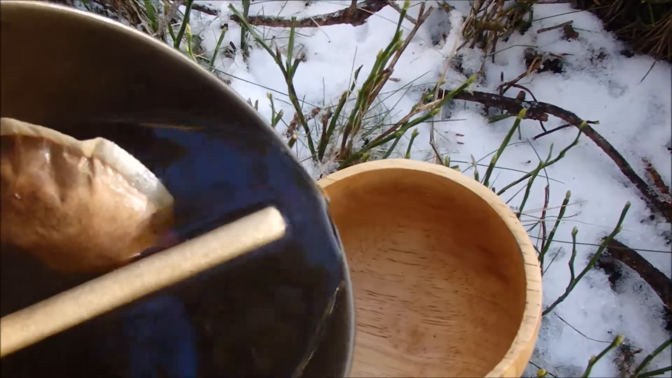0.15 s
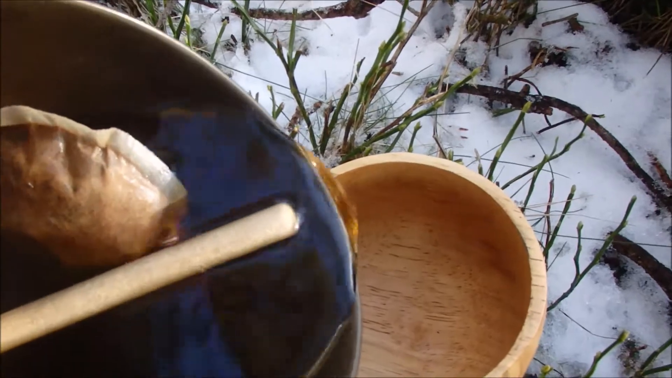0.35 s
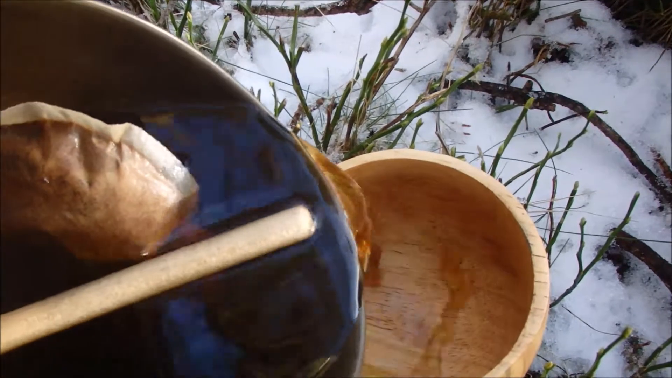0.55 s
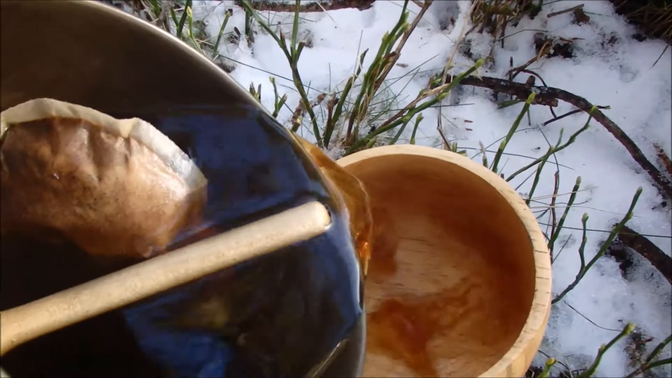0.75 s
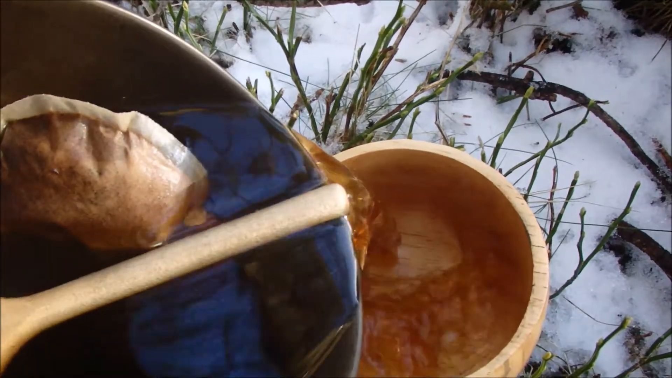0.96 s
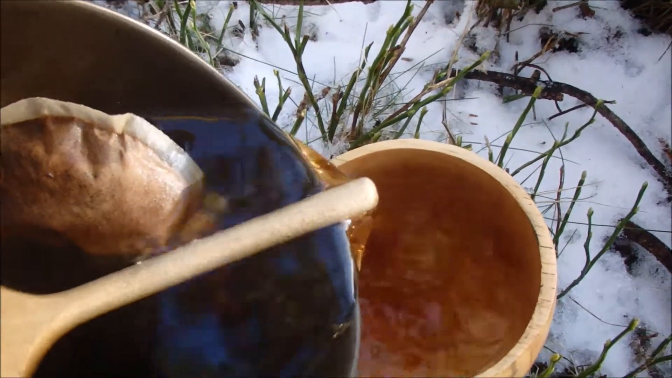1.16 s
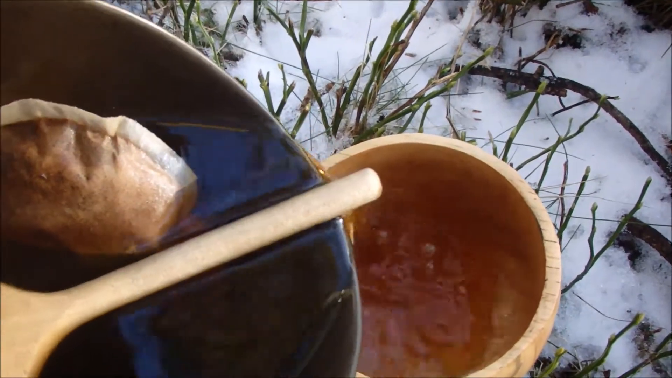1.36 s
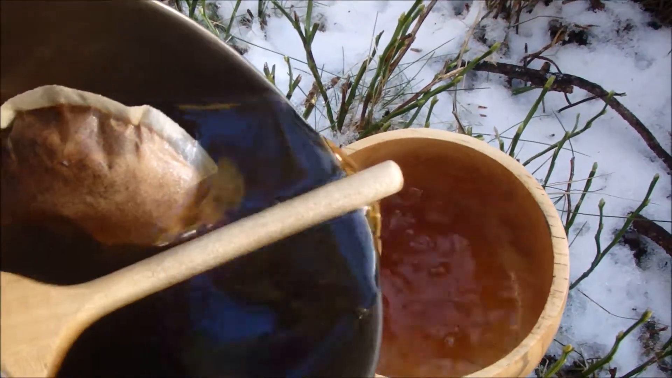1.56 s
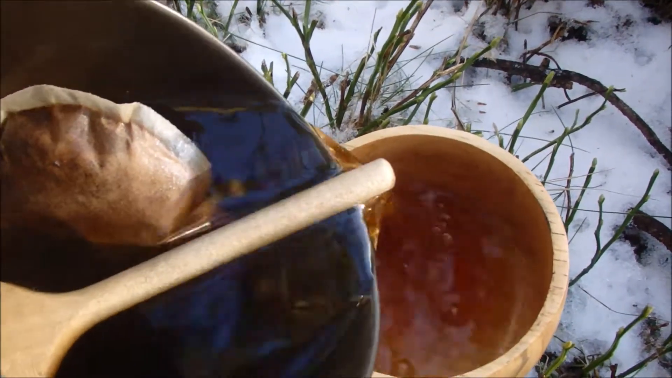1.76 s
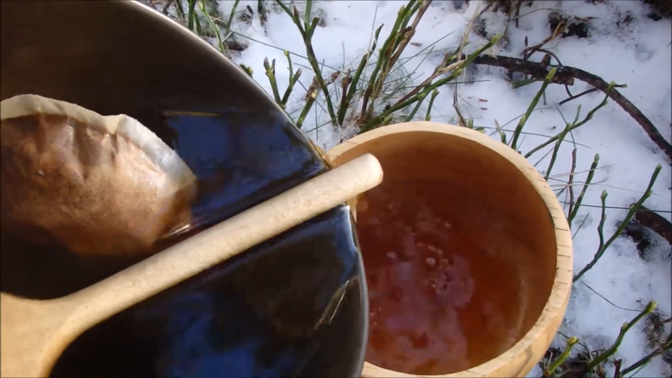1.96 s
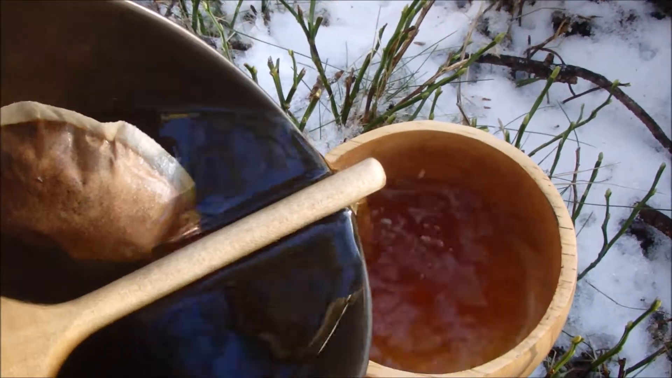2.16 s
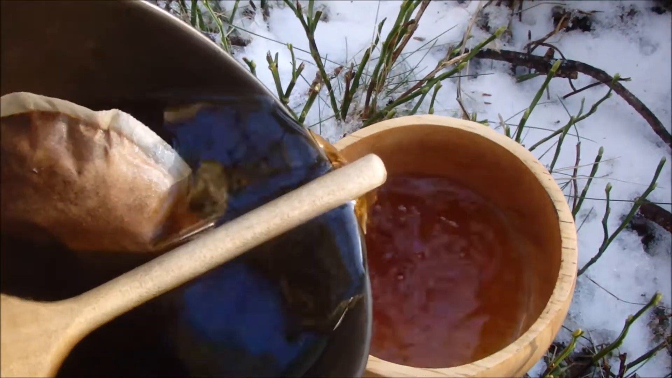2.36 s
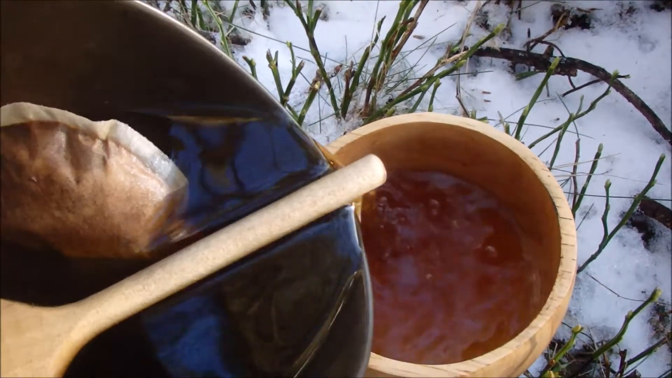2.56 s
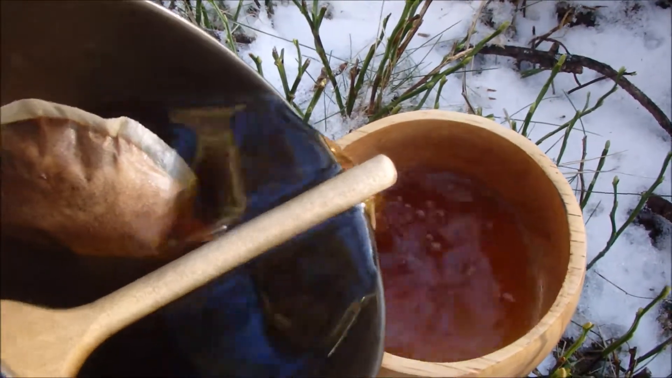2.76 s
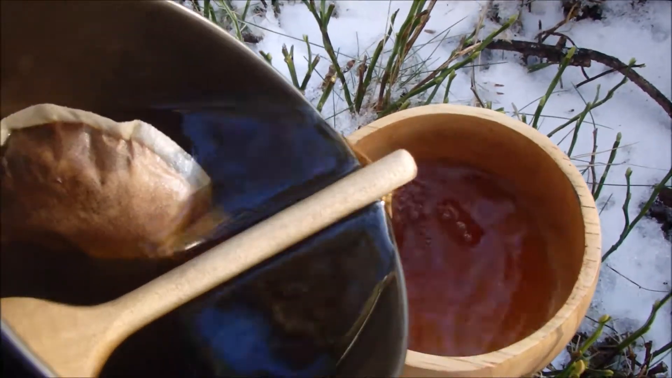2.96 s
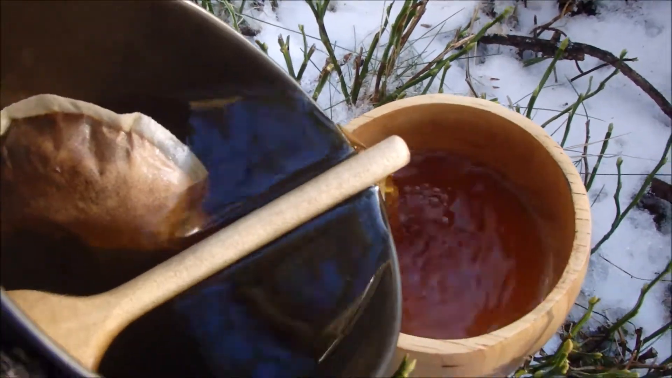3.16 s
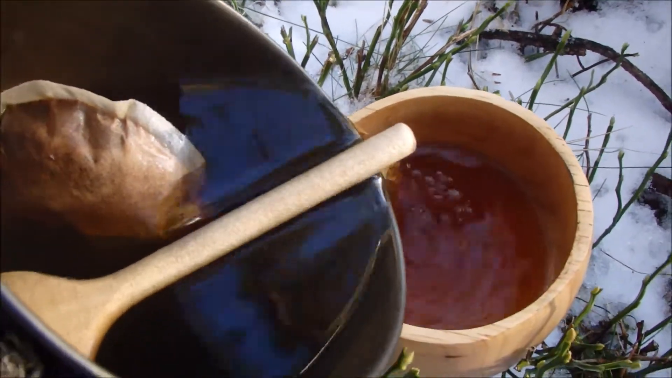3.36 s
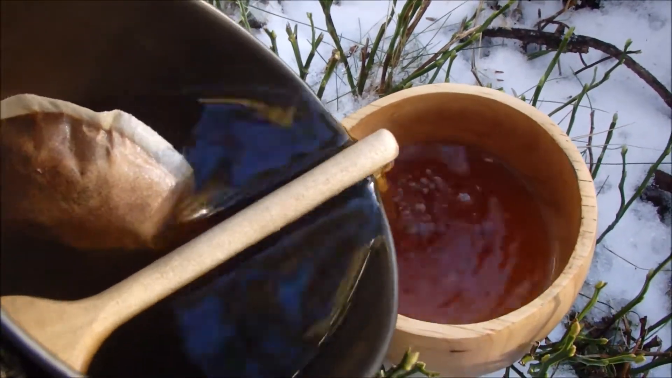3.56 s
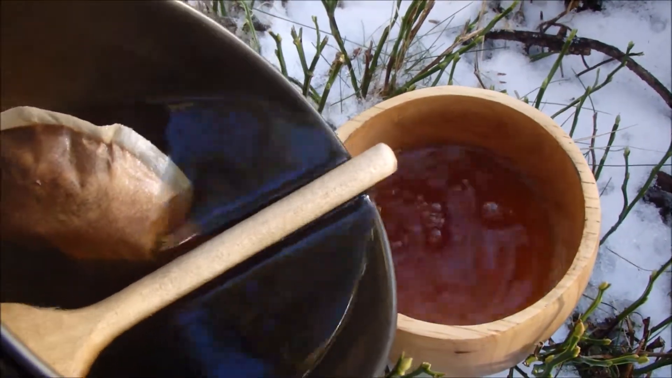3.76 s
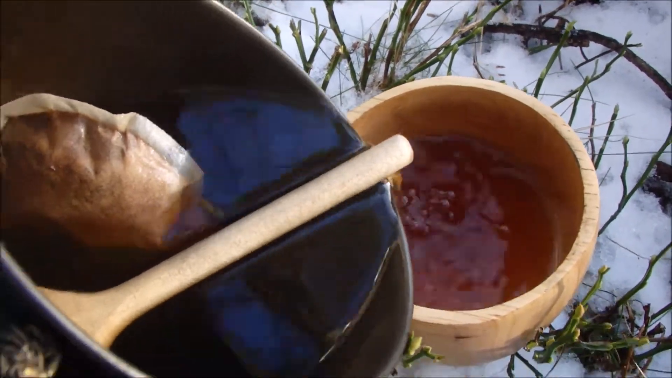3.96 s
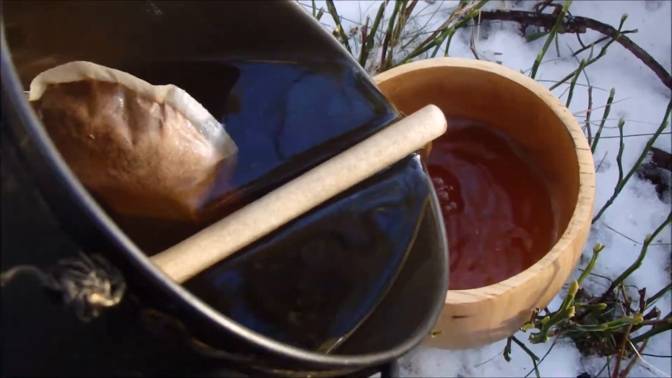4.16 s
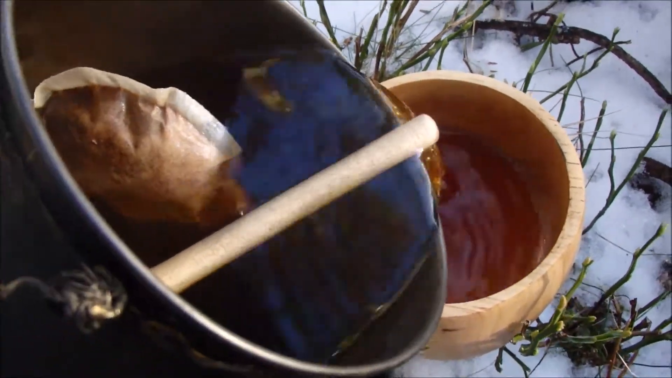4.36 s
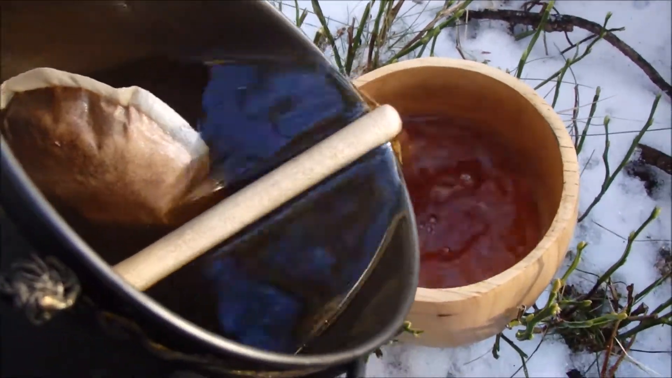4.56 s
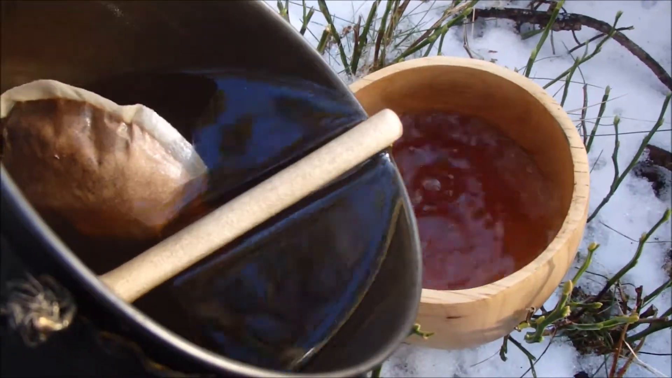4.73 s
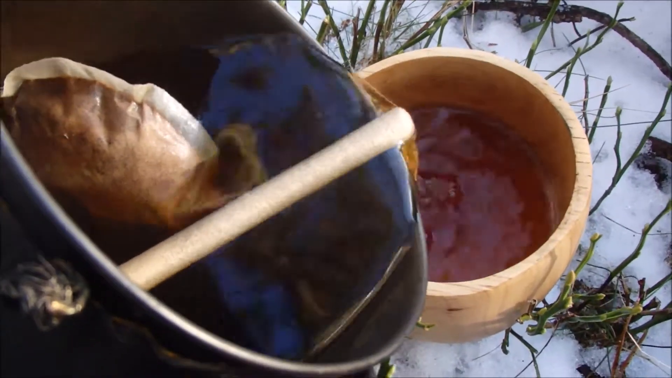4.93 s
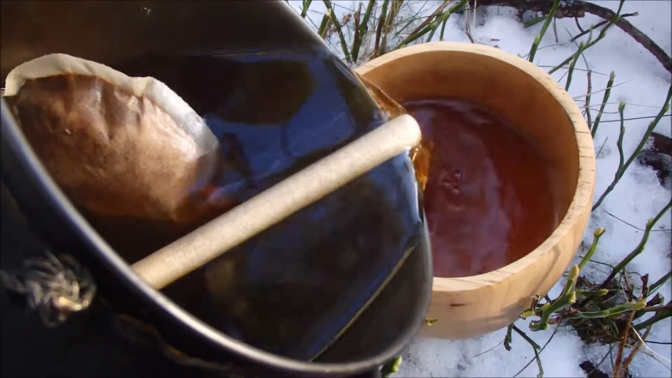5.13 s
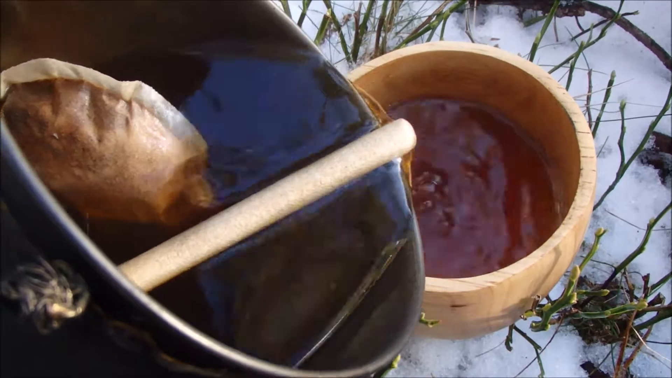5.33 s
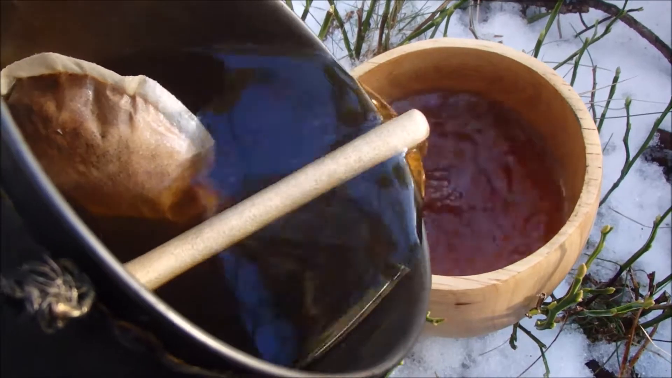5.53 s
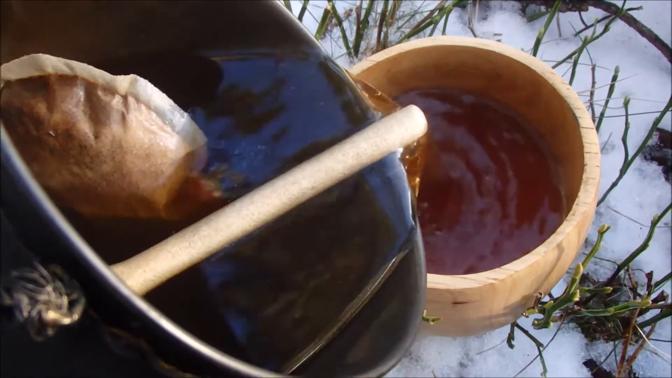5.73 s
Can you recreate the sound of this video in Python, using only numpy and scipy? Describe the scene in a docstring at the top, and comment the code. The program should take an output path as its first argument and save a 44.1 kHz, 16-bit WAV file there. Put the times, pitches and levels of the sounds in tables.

```python
"""Drink poured into a wooden bowl

Outdoors in the snow, heard close up, a drink runs over the rim of a metal pot: short plops over a fine fizz.
Damped, rising sines make the bubbles; shaped noise makes the spray, mist and air. A wooden spoon knocks in the
pot and its handle clinks, as ringing modes with a scrape. The stream slides over bare wood, then spatters and traps
air in the rising pool. Two resonant microphone ports pick it up, the right one muffled."""
import sys
import numpy as np
from scipy import signal
from scipy.fft import rfft, irfft, next_fast_len
from scipy.io import wavfile
from scipy.ndimage import map_coordinates

SR = 44100
rng = np.random.default_rng(int(sys.argv[2]) if len(sys.argv) > 2 else 0)


def put_to_file(sound):
    """Save the sound as 16-bit audio at rate SR, in the file named by the first command-line argument."""
    columns = np.atleast_2d(sound).T  # one column per channel
    safe = np.clip(columns, -1, 1)
    whole_steps = np.round(safe * 32767)
    wavfile.write(sys.argv[1], SR, whole_steps.astype(np.int16))


N = 259749  # length in samples


def amp(db):
    """Decibels to gain."""
    return 10 ** (np.asarray(db) / 20)


def unit(x):
    """x scaled to rms 1."""
    return x / np.sqrt(np.mean(x ** 2) + 1e-20)


def along(points, hz):
    """(Hz, value) points read on a log frequency axis."""
    point_hz, value = np.transpose(points)
    return np.interp(np.log(hz + 1), np.log(point_hz + 1), value)


def curves(rows):
    """One value per sample for each column after the time."""
    s, *columns = np.transpose(rows)
    return [np.interp(np.arange(N) / SR, s, column) for column in columns]


def wobble(rate):
    """A smooth random curve with this many knots a second."""
    knots = rng.standard_normal(int(N * rate / SR) + 4)
    return map_coordinates(knots, [np.arange(N) * rate / SR])


def fade(t, t60):
    """A decay that loses 60 dB in t60 seconds."""
    return np.exp(-np.log(1000) * t / max(t60, 1e-4))


def flowing(rows, ramp_s=0.043):
    """Fades a flow in at the first row of its curve and out after the last."""
    t = np.arange(N) / SR
    fade_in = np.clip((t - rows[0][0]) / ramp_s, 0, 1)
    fade_out = np.clip(1 + (rows[-1][0] - t) / ramp_s, 0, 1)
    return fade_in * fade_out


def add(track, s, sound):
    """Mix a sound into the track at time s."""
    part = track[max(round(s * SR), 0):][:len(sound)]
    part += sound[:len(part)]


def coloured(x, gain):
    """x through the causal, minimum-phase filter that has this gain over frequency."""
    m = 2 * next_fast_len(N // 2 + SR // 8)
    log_gain = np.log(np.maximum(gain(np.fft.rfftfreq(m, 1 / SR)), 1e-6))
    # folding the cepstrum onto positive times makes the filter causal
    cepstrum = irfft(log_gain, m)
    cepstrum[1:m // 2] *= 2
    cepstrum[m // 2 + 1:] = 0
    return irfft(rfft(x, m) * np.exp(rfft(cepstrum)), m)[..., :N]


def bubbles(rate, centre_hz, spread, cycles, scatter_db, rise, size=512):
    """A swarm of tiny damped bubbles, rms 1: random times, pitches and strengths, each gliding up."""
    draw = rng.random((int(rate * N / SR), 4))
    start = (draw[:, :1] * N).astype(int)
    bell = np.log((draw[:, 1:2] + .05) / (1.05 - draw[:, 1:2]))  # mostly near the centre pitch
    hz = np.minimum((centre_hz * np.ones(N))[start] * np.exp(spread * bell), SR / 3)
    turns = hz * np.arange(size) / SR
    age = turns / (cycles * (.5 + draw[:, 2:3]))  # reaches 1 when the ring is 60 dB down
    tone = np.sin(2 * np.pi * turns * (1 + rise * age))
    rings = amp(scatter_db * draw[:, 3:] ** 2) * tone * np.exp(-np.log(1000) * age)
    places = start + np.arange(size)
    return unit(np.bincount(places.ravel(), rings.ravel(), N)[:N])


# Still outdoor air and microphone hiss. Each row: frequency [Hz], relative density [dB per Hz].
AIR_SPECTRUM = [(20, -15), (60, -10.5), (120, 0), (250, 0.5), (500, 2), (950, 2.5), (1600, -2.5),
                (2200, -4), (2800, -0.5), (3500, -5), (4200, -4), (6000, -5), (11000, -5.5), (14500, -5)]
# How alike the air is on both sides. Each row: frequency [Hz], left-right likeness [0 to 1].
AIR_LIKENESS = [(20, .05), (45, 0.55), (120, 0.78), (1000, 0.72), (3000, 0.17), (5000, 0)]
# A faint low hum. Each row: time [s], level before wavering [dB].
HUM_LEVEL = [(0, -70), (1.9, -75), (2.3, -74), (3.2, -69), (3.6, -63.5), (4.5, -62.5), (4.9, -66),
             (5.3, -64.5), (5.89, -62.5)]


def air(db=-48.0, hum_hz=164, left_db=0.33):
    """Quiet air, alike on both sides in the bass, with unrelated hiss above and a wavering hum."""
    a, b = rng.standard_normal((2, N))
    alike = lambda hz: np.clip(along(AIR_LIKENESS, hz), -.99, .99)
    mid = coloured(a, lambda hz: amp(along(AIR_SPECTRUM, hz)) * np.sqrt(1 + alike(hz)))
    side = coloured(b, lambda hz: amp(along(AIR_SPECTRUM, hz)) * np.sqrt(1 - alike(hz)))
    phase = 2 * np.pi * np.cumsum(hum_hz + 6 * wobble(25)) / SR
    hum = amp(curves(HUM_LEVEL)[0] + 3.6 * wobble(12)) * np.sin(phase)
    hiss = amp(db) * unit(np.array([mid + side, mid - side]))
    return (hiss + hum) * amp([[left_db], [-left_db]])


# Soft, dull bumps of handling. Each row: start [s], level of the lower tone [dB], its pitch [Hz], t60 [s].
HANDLING_BUMPS = [(.36, -30, 205, 0.043), (5.19, -55, 48, .16)]


def bump(overtone=1.87):
    """Dull bumps as the pot is tipped: a low damped tone and one overtone."""
    out, t = np.zeros(N), np.arange(SR // 5) / SR
    for s, db, hz, t60 in HANDLING_BUMPS:
        ring = np.sin(2 * np.pi * hz * t) + .5 * np.sin(2 * np.pi * hz * overtone * t)
        add(out, s, amp(db) * ring * fade(t, t60) * (1 - np.exp(-t / 0.0059)))
    return out


# The spoon against the pot. Each row: start [s], relative body level [dB], relative edge level [dB],
# t60 of the scraping contact [s].
SPOON_KNOCKS = [(.113, -44.5, -48, .01), (.246, -46, -45, .01), (.379, -41, -39, 0.028),
                (.535, -37.5, -37, 0.12), (0.699, -48, -39.5, 0.12), (0.78, -44, -47, .01),
                (.870, -25.5, -16, 0.0073), (0.961, -58, -41, .008), (1.027, -28.5, -20, 0.0075),
                (1.249, -31, -33, 0.013), (1.387, -35, -31, 0.037), (1.468, -29, -28, 0.054)]
# What a knock rings with. Each row: mode frequency [Hz], relative level [dB], t60 [s].
POT_MODES = [(817.5, -2.5, 0.11), (950, -3.5, 0.12), (1224, -17.5, 0.17), (1970, -14.5, 0.074),
             (2728, -5, 0.083), (2936, -6, 0.03), (3270, -21, .04), (3870, -11.5, 0.032), (4350, -9, 0.052),
             (5610, -2, 0.033), (6200, -14.5, 0.071), (7370, -13.5, .05), (8650, -17, 0.071),
             (9700, -20, 0.036)]
# The metal handle shifts on the pot as it is tipped further. Each row: start [s], relative body level [dB],
# relative edge level [dB], t60 of the scraping contact [s].
HANDLE_CLINKS = [(4.339, -38, -32, 0.082), (4.441, -38, -25.5, 0.061), (4.496, -50, -35.5, 0.046),
                 (4.544, -43, -32, 0.082), (4.571, -40, -24, 0.033)]
# What a clink rings with. Each row: mode frequency [Hz], relative level [dB], t60 [s].
HANDLE_MODES = [(954, -2.5, .1), (1880, -12, .05), (2875, -13, 0.037), (3957, -3.5, .09), (4480, -2, .05),
                (5200, -5, .03), (6230, -2, 0.044), (8500, -6, .05), (9200, -8, .04)]
# The rub of the contact on the pot. Each row: frequency [Hz], relative density [dB per Hz].
SCRAPE_SPECTRUM = [(500, -14), (2100, -11), (2700, 11), (3400, -3), (4000, 3.5), (5500, 2.5), (10000, -0.5),
                   (13000, -19)]


def knocks(rows, modes, body_hz=2000, scrape_db=0, ring_db=-6, rattle=0.38):
    """Each knock rings its modes, roughened as spoon or handle chatters against the pot and scrapes for a moment."""
    out, scrape, t = np.zeros(N), np.zeros(N), np.arange(SR // 4) / SR
    for s, body_db, edge_db, contact_t60 in rows:
        for hz, db, t60 in modes:
            # body drives the modes below body_hz, edge those above
            strike_db = body_db if hz < body_hz else edge_db + ring_db
            level_db = db + strike_db + rng.standard_normal()
            # the phase wanders a little each cycle
            drift = rattle * np.sqrt(hz / SR) * np.cumsum(rng.standard_normal(len(t)))
            ring = np.sin(2 * np.pi * (hz * t + rng.random()) + drift) * fade(t, t60)
            add(out, s, amp(level_db) * ring * (1 - np.exp(-t / 0.00064)))
        rub = rng.standard_normal(len(t)) * fade(t, contact_t60) * (1 - np.exp(-t / 0.00055))
        add(scrape, s, amp(edge_db + scrape_db) * rub)
    return out + coloured(scrape, lambda hz: amp(along(SCRAPE_SPECTRUM, hz)))


# The first liquid sliding over dry wood. Each row: time [s], relative level [dB], pitch of its note [Hz].
TRICKLE_FLOW = [(.42, -63, 1520), (.52, -51, 1570), (.64, -52, 1600), (.76, -60, 1680), (.9, -66, 1750)]


def trickle(wash_db=2, note_db=-5):
    """A film of liquid spreads over the dry wood: a soft wash and a hazy, slowly rising note of tiny bubbles."""
    level_db, hz = curves(TRICKLE_FLOW)
    wash = bubbles(rate=900, centre_hz=970, spread=0.49, cycles=6.5, scatter_db=9, rise=0.046, size=320)
    note = bubbles(rate=500, centre_hz=hz, spread=0.012, cycles=49, scatter_db=-1, rise=.01, size=1000)
    return flowing(TRICKLE_FLOW) * amp(level_db) * (amp(note_db) * note + amp(wash_db) * wash)


# The stream on bare wood, until the pool cushions it. Each row: time [s], level [dB].
SPATTER_LEVEL = [(1.06, -62), (1.13, -74), (1.22, -43), (1.33, -55), (1.42, -45.5), (1.55, -67), (1.7, -48),
                 (1.95, -90)]


def spatter():
    """While the bowl is nearly empty, the stream shatters on the wood into a dense crackle of tiny rings."""
    crackle = bubbles(rate=2700, centre_hz=4100, spread=0.14, cycles=14, scatter_db=38, rise=.03, size=200)
    return flowing(SPATTER_LEVEL) * amp(curves(SPATTER_LEVEL)[0]) * crackle


def mist(db=-9, flutter_db=4, thins_db_per_s=4.0):
    """Droplets too small to tell apart make a soft, fluttering wash of noise; it thins as the pool deepens."""
    noise = coloured(rng.standard_normal(N), lambda hz: amp(along(SPRAY_SPECTRUM, hz)))
    wash = unit(noise * amp(flutter_db * wobble(70)))
    poured_s = np.arange(N) / SR - STREAM_FLOW[0][0]
    fizz_level = curves(STREAM_FLOW)[2]
    return flowing(STREAM_FLOW) * amp(fizz_level + db - thins_db_per_s * poured_s) * wash


# Bubbles the stream stirs up; it thins from 3.5 s and twice nearly breaks off. Each row: time [s],
# relative burble level [dB], relative seethe level [dB], relative fizz level [dB].
STREAM_FLOW = [(1.07, -50, -65, -45), (1.24, -53, -46.5, -46.5), (1.47, -37.5, -48.5, -45.5),
               (1.66, -48, -54, -48.5), (1.86, -45.5, -56, -51.5), (2.08, -44.5, -51, -44),
               (2.3, -32.5, -43, -44.5), (2.47, -47, -53, -52.5), (2.72, -38.5, -45.5, -47.5),
               (2.86, -41.5, -53.5, -52.5), (3.07, -47.5, -41.5, -48), (3.42, -41, -50, -47.5),
               (3.6, -50, -58, -53), (3.82, -49, -60, -53), (3.97, -37.5, -54, -47),
               (4.15, -67, -70, -59.5), (4.4, -48.5, -59, -50), (4.92, -48, -53, -50),
               (5.13, -71, -78, -59), (5.25, -46.5, -62, -52), (5.55, -42.5, -48.5, -54),
               (5.89, -42.5, -55, -54.5)]
# Typical bubble pitch, high in the first shallow film and lowest in the full flow. Each row: time [s], pitch [Hz].
BUBBLE_PITCH = [(1.05, 2520), (1.3, 2380), (1.42, 1520), (2.0, 1740), (2.35, 1288), (2.75, 1218),
                (3.3, 1250), (4.0, 1440), (4.8, 1610), (5.5, 1840), (5.89, 1790)]


def stream(burble_db=-4.0, seethe_db=-4, fizz_db=-3, clump_db=3.0):
    """The falling stream keeps up a patter of mid-sized bubbles, a seethe of smaller ones and a fizz of the smallest."""
    burble_level, seethe_level, fizz_level = curves(STREAM_FLOW)
    pitch = curves(BUBBLE_PITCH)[0]
    burble = bubbles(rate=300, centre_hz=pitch, spread=0.226, cycles=18.0, scatter_db=25, rise=0.25)
    seethe = bubbles(rate=480, centre_hz=3000, spread=0.092, cycles=22, scatter_db=34.5, rise=0.11)
    fizz = bubbles(rate=520, centre_hz=6700, spread=0.199, cycles=55, scatter_db=22, rise=0.044)
    swarm = amp(burble_level + burble_db) * burble
    swarm += amp(seethe_level + seethe_db) * seethe
    swarm += amp(fizz_level + fizz_db) * fizz
    clumps = unit(amp(clump_db * wobble(90)))  # the stream breaks into lumps, which stir all sizes at once
    return flowing(STREAM_FLOW) * clumps * swarm


# A pocket of POCKET_DB at POCKET_HZ rings for POCKET_T60 seconds.
POCKET_T60, POCKET_HZ, POCKET_DB = 0.011, 1190, -19
# Small pockets die a little sooner (power of pitch); so do strong ones, nearer the surface (dB of life per dB).
PITCH_DAMPING, DAMPING = 0.44, 0.19
POCKET_RISE = .1  # sets the upward glide of a pocket's phase over its t60


def drop(db, hz, ping_db, spray_db, ping_hz=3000, ping_t60=0.006, ping_gain_db=2.0, spray_t60=0.0054,
         spray_gain_db=7, lead_s=0.0035, lead_db=-11, swell_s=0.00012):
    """One drop: its air pocket rings a few cycles, rising as it surfaces, a smaller bubble pings, and spray flies."""
    t = np.arange(SR // 25) / SR
    t60 = POCKET_T60 * (POCKET_HZ / hz) ** PITCH_DAMPING * amp(-DAMPING * (db - POCKET_DB))
    glide = 1 + POCKET_RISE * (t / t60 - .2)
    pocket = -amp(db) * np.sin(2 * np.pi * hz * glide * t) * fade(t, t60)
    small_hz = ping_hz * np.exp(0.055 * rng.standard_normal())
    ping = amp(ping_db + ping_gain_db) * np.sin(2 * np.pi * small_hz * t) * fade(t, ping_t60)
    # the splash swells while the drop digs its crater and snaps, in the middle of its span, as the crater closes
    from_snap = t - t[-1] / 2
    before = amp(lead_db) * fade(abs(from_snap), 2 * lead_s)
    after = fade(abs(from_snap), spray_t60)
    splash = np.where(from_snap < 0, before, after)
    spray = amp(spray_db + spray_gain_db) * rng.standard_normal(len(t)) * splash
    return (pocket + ping) * (1 - np.exp(-t / swell_s)), spray


# Lesser drops: pocket, ping and spray lie this far over the stream's burble, seethe and fizz (dB).
DROPS_PER_S, DROP_OVER_DB, DROP_SCATTER_DB = 48, (10, 10.5, 2), 3.5
DROP_PITCH, DROP_PITCH_SPREAD = 0.88, .16  # times the typical bubble pitch; log spread


def lesser_drops():
    """Rows like BIG_DROPS for drops that fall at random: the stronger the stream, the louder they are."""
    first, last = STREAM_FLOW[0][0], STREAM_FLOW[-1][0]
    levels, pitch = np.array(curves(STREAM_FLOW)), curves(BUBBLE_PITCH)[0]
    gaps, chance = rng.exponential(1 / DROPS_PER_S, size=400), rng.standard_normal((400, 4))
    rows = []
    for s, luck in zip(first + np.cumsum(gaps), chance):
        if s < min(last, N / SR):
            now = int(s * SR)
            pocket_db, ping_db, spray_db = levels[:, now] + np.array(DROP_OVER_DB) + DROP_SCATTER_DB * luck[:3]
            hz = DROP_PITCH * pitch[now] * np.exp(DROP_PITCH_SPREAD * luck[3])
            rows.append((s, pocket_db, hz, ping_db, spray_db))
    return rows


# The big drops that stand out of the pour. Each row: time [s], air pocket level [dB], its base pitch [Hz],
# relative level of the small-bubble ping [dB], relative spray level [dB].
BIG_DROPS = [(1.1, -29, 1250, -59, -51), (1.1892, -21, 2310, -22, -28), (1.2965, -43, 1800, -28, -49),
             (1.3232, -39, 1940, -42, -31.5), (1.5306, -19, 1810, -45, -30.5),
             (1.5969, -20, 1260, -27.5, -49), (1.668, -27, 1500, -12.5, -27),
             (1.7085, -25, 1300, -31, -30.5), (1.7357, -5, 1154, -24.5, -28),
             (1.7644, -17.5, 1560, -35, -23.5), (1.7732, -28, 1090, -22, -34),
             (1.7978, -18.5, 1010, -24, -22.5), (1.8257, -8, 1770, -19, -20.5),
             (1.876, -23.5, 1070, -25.5, -46), (1.9575, -20.5, 1590, -35, -36),
             (1.9959, -14, 940, -24, -33.5), (2.1728, -19.5, 1630, -24.5, -47),
             (2.2053, -20, 1290, -23.5, -41), (2.2519, -15.5, 1180, -23, -27.5),
             (2.2917, -28, 1600, -22, -24), (2.3299, -16, 1030, -35, -27), (2.3449, -6.5, 1150, -15, -31.5),
             (2.3705, -13.5, 1030, -26, -28), (2.3955, -9, 1280, -27, -33), (2.4023, -16, 1150, -35, -39),
             (2.4425, -41, 1250, -43, -24), (2.4537, -9, 1000, -22.5, -28), (2.4664, -14.5, 1630, -41, -44),
             (2.5059, -20, 1150, -21, -21), (2.52, -5, 1060, -21.5, -36), (2.688, -21.5, 750, -30, -50),
             (2.7316, -19, 920, -26.5, -31), (2.7514, -27, 890, -37, -27),
             (2.7722, -20.5, 1280, -45, -29.5), (2.9171, -10.5, 1210, -22.5, -22),
             (2.9323, -16.5, 1860, -23.5, -32), (2.9486, -16.5, 780, -46, -50),
             (2.9764, -24, 781, -27.5, -36), (3.009, -12.5, 820, -35, -49), (3.0177, -14, 1430, -40, -49),
             (3.0852, -28, 880, -25, -38), (3.2653, -21, 870, -44, -52), (3.29, -18, 885, -25, -30),
             (3.378, -12, 680, -54, -35.5), (3.4323, -16.5, 1244, -38, -55),
             (3.4594, -19, 1870, -20.5, -58), (3.5727, -12.5, 1160, -32, -41),
             (3.5926, -12, 1060, -31.5, -39), (3.641, -20, 930, -26, -38), (3.6773, -18, 840, -33, -47),
             (3.7149, -22.5, 1706, -33, -22), (3.7409, -23, 1250, -15.5, -27.5),
             (3.7673, -4, 1140, -26, -30), (3.8005, -17.5, 1310, -36, -44), (3.9272, -17, 1140, -34, -25.5),
             (3.944, -26, 1930, -29, -26.5), (3.9714, -14, 1320, -26, -30.5),
             (4.0148, -16.5, 910, -42, -39), (4.021, -21.5, 890, -34, -28), (4.131, -46, 1460, -33, -40.5),
             (4.2885, -22, 900, -38, -31.5), (4.3265, -19.5, 1180, -49, -31.5),
             (4.3805, -12.5, 1600, -24, -30.5), (4.4328, -19.5, 1520, -37, -49),
             (4.473, -24, 1830, -46, -48), (4.5442, -19, 1290, -37, -35), (4.5903, -10, 1530, -19.5, -29.5),
             (4.6592, -18, 1400, -31, -39), (4.7065, -21, 1090, -29.5, -37), (4.8415, -21, 970, -34.5, -45),
             (4.9008, -20.5, 1366, -28, -24), (4.9493, -31, 1900, -26.5, -32),
             (4.9799, -21, 1320, -20.5, -32), (5.015, -9.5, 1870, -41, -34), (5.04, -32, 1210, -45, -31),
             (5.1862, -19, 1530, -44, -54), (5.23, -22.5, 1390, -30, -25), (5.3557, -42, 1540, -25, -31.5),
             (5.5682, -23, 1900, -42, -51), (5.6012, -23.5, 1730, -33, -41.5),
             (5.7254, -18, 1470, -51, -45), (5.8129, -26, 1720, -37, -44)]
# Colour of spray and mist. Each row: frequency [Hz], relative density [dB per Hz].
SPRAY_SPECTRUM = [(1500, -36), (3300, -2.5), (4600, 4.5), (7000, 5.5), (10000, -2.5), (12500, -11.5),
                  (16000, -18)]
# Spray is finer once the pool is deep. Each row: frequency [Hz], gain over the early spray [dB].
FINER_SPRAY = [(2500, 0), (5200, -5.5), (7000, -1), (9500, 7), (12500, 5), (16000, 3)]
# When the spray starts and ends turning finer: two times [s].
FINER_SPAN = (3.56, 3.7)


def plops(pinch_s=.0005):
    """Big and lesser drops land in the pool; each pocket pinches off a moment after the snap of its splash."""
    rings, spray = np.zeros(N), np.zeros(N)
    for s, *kind in list(BIG_DROPS) + lesser_drops():
        ring, splash = drop(*kind)
        add(rings, s, ring)
        add(spray, s - pinch_s - len(splash) / SR / 2, splash)
    depth = np.interp(np.arange(N) / SR, FINER_SPAN, (0, 1))
    coarse = coloured(spray * (1 - depth), lambda hz: amp(along(SPRAY_SPECTRUM, hz)))
    fine = coloured(spray * depth, lambda hz: amp(along(SPRAY_SPECTRUM, hz) + along(FINER_SPRAY, hz)))
    return rings + coarse + fine


def bowl_echo(x, t60=0.034, wet_db=-18):
    """Sound bounces briefly between bowl and pot, as short noise tails; the snow returns nothing."""
    t = np.arange(SR // 10) / SR
    out, block = np.zeros(N), SR // 8
    for start in range(0, N, block):  # each block gets its own random tail
        tail = rng.standard_normal(len(t)) * fade(t, t60) * (1 - np.exp(-t / 0.00025))
        add(out, start / SR, signal.fftconvolve(x[start:start + block], tail / np.linalg.norm(tail)))
    tone = [(500, 4), (900, 7.5), (1500, 7.5), (3000, 2.0), (12000, 3.5)]  # Hz, dB
    return amp(wet_db) * coloured(out, lambda hz: amp(along(tone, hz)))


# Resonances and notches of each microphone port. Each row: centre [Hz], width [Hz], gain [dB].
LEFT_RESONANCES = [(2600, 460, -5), (3180, 520, 4), (4090, 690, 7.5), (4820, 730, 5.5), (6330, 500, 5.5),
                   (8010, 330, 6), (11000, 4000, -1.5)]
RIGHT_RESONANCES = [(2353, 69, -14), (3238, 285, 7.5), (4130, 714, 16.5)]
# Broad tone of each port, the right one muffled. Each row: frequency [Hz], gain [dB].
LEFT_TONE = [(60, -22), (300, -18), (600, -12.5), (850, -0.5), (3000, 5), (5600, 0), (16000, 3)]
RIGHT_TONE = [(60, -29), (300, -19), (600, -13), (850, -0.5), (3200, 5), (3650, -4.5), (4500, -12.5),
              (5300, -15), (9000, -16), (16000, 1)]


def port(x, peaks, slope):
    """A microphone port colours the sound with its resonances."""
    def gain(hz):
        resonance = sum(db / (1 + (2 * (hz - centre) / width) ** 2) for centre, width, db in peaks)
        return amp(along(slope, hz) + resonance)
    return coloured(x, gain)


def scene(apart_db=-3):
    """Pour and spoon reach the left port one sample before the right; part of the echo differs between the two."""
    near = stream() + spatter() + trickle() + mist() + plops()
    near += knocks(SPOON_KNOCKS, POT_MODES) + knocks(HANDLE_CLINKS, HANDLE_MODES)
    shared = near + bowl_echo(near)
    left = port(shared + amp(apart_db) * bowl_echo(near), LEFT_RESONANCES, LEFT_TONE)
    right = port(shared + amp(apart_db) * bowl_echo(near), RIGHT_RESONANCES, RIGHT_TONE)
    return np.array([left, np.roll(right, 1)]) + bump() + air()


def record(dry, top_hz=15700):
    """A very steep low-pass limits the band at top_hz."""
    m = next_fast_len(N + SR // 4)
    hz = np.fft.rfftfreq(m, 1 / SR)
    return irfft(rfft(dry, m) / np.sqrt(1 + (hz / top_hz) ** 120), m)[..., :N]


dry = scene()
out = record(dry)
put_to_file(out)
```